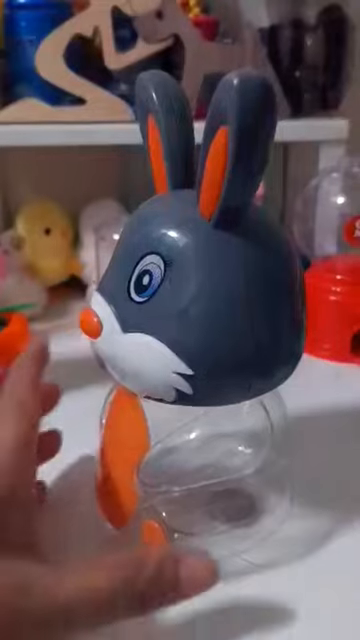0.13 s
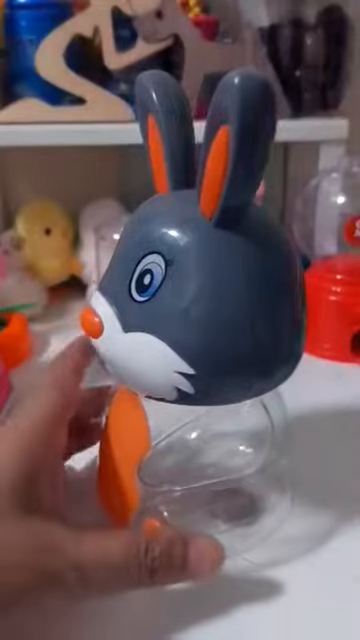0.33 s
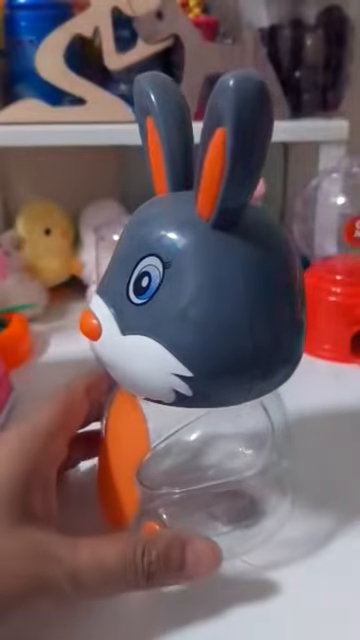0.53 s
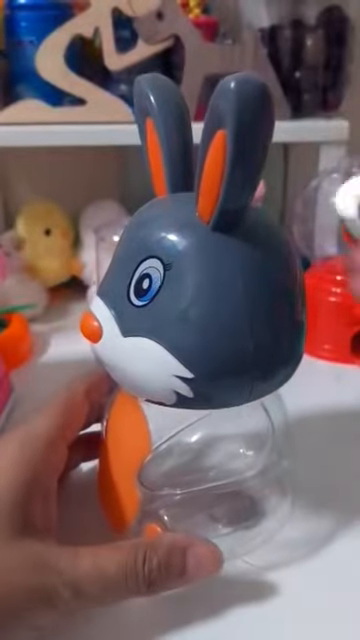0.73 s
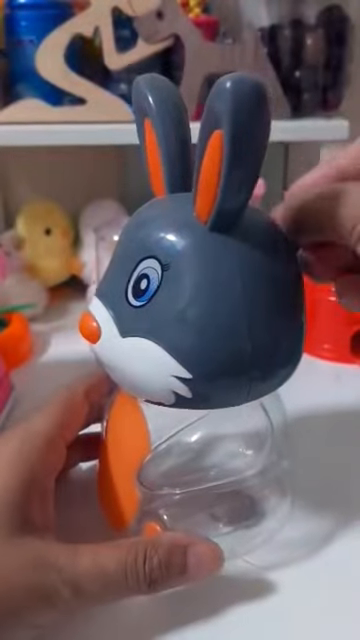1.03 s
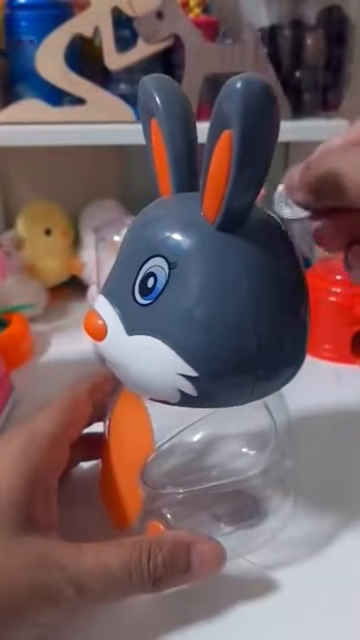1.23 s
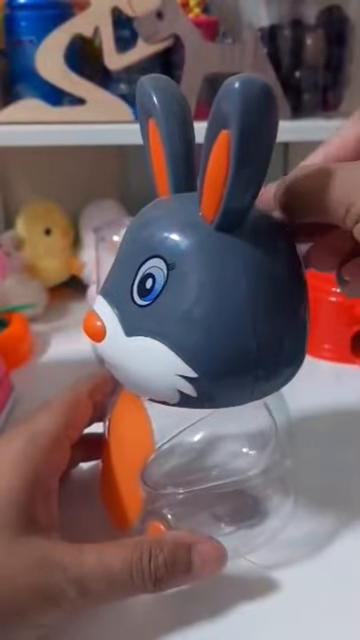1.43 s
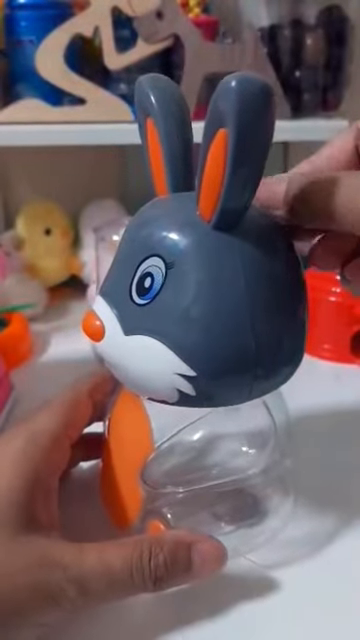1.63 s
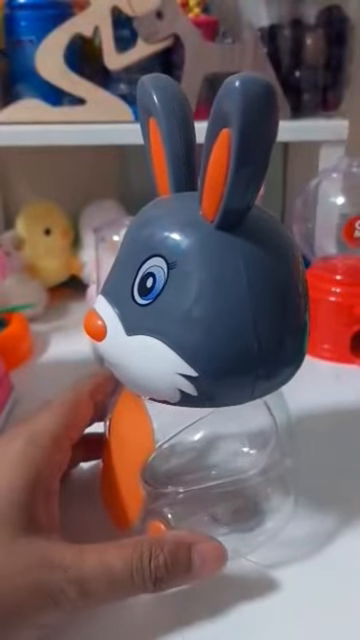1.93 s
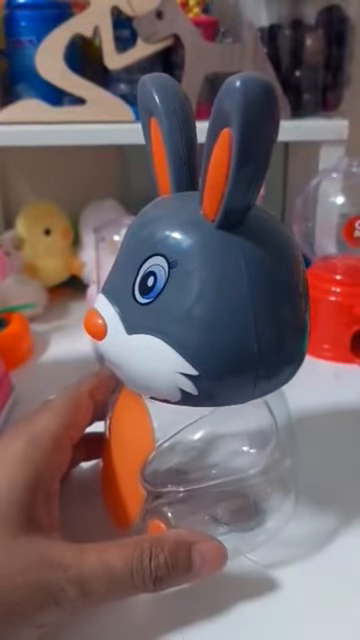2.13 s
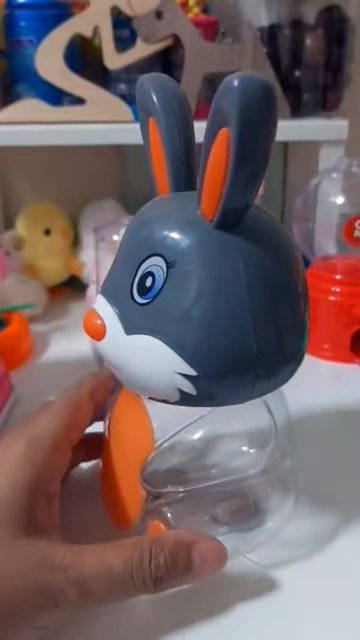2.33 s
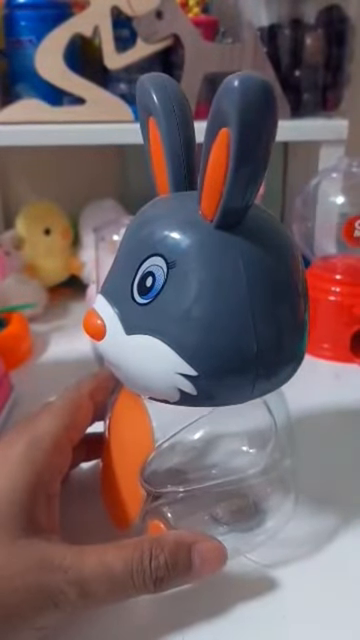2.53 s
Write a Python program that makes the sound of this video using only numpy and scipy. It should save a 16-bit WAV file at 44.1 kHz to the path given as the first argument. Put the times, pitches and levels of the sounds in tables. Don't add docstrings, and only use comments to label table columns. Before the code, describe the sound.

Coin falling into a hollow plastic bank: soft cloth rustles and four light ticks first, then a loud clack, a flurry of bouncing clatter and weakening taps, recorded closely indoors over low hum and hiss.

```python
import sys
import numpy as np
from scipy import signal
from scipy.io import wavfile
from scipy.ndimage import uniform_filter1d

SR = 44100
rng = np.random.default_rng(int(sys.argv[2]) if len(sys.argv) > 2 else 0)


def wav_out(sig):
    wavfile.write(sys.argv[1], SR, np.round(np.clip(np.atleast_2d(sig).T, -1, 1) * 32767).astype(np.int16))


def convert_level_to_amplitude(level_db):
    exponent = np.asarray(level_db, float) / 20
    return 10 ** exponent


N = 119070

# [t/s, peak level/dB, hollow body share/dB, coin brightness/dB, contact/ms]
BLOWS = [(1.8813, -5.5, -5.5, -6.5, 0.96), (1.8823, -16, -10.5, -5.5, 1.5), (1.9494, -15, -15, -9, 0.78),
         (1.9618, -25.5, 8, -14, 2.9), (1.9705, -33, -6, -6, 2.5), (1.994, -33, -2, -15, 1.3),
         (2.024, -14, -17, -10, 0.94), (2.0349, -4, -13.5, -8.5, 2.24), (2.0359, -11, -6, -8, 0.87),
         (2.0464, -15, -6, -11, 2.4), (2.081, -20, -4, -16, 0.96), (2.0858, -26, -13, -6, 2),
         (2.111, -33.5, 9, -24, 2.2), (2.1185, -29, -3, -5, 1.6), (2.1212, -32, 1, -2.5, 0.86),
         (2.13, -31, 1, -7, 1.5), (2.1457, -28, -15, -5, 0.79), (2.1623, -17.5, -7.5, -9, 1.1),
         (2.1643, -12, -11.5, -9, 1.2), (2.1675, -16.5, -33, -3, 1.6), (2.1722, -9, -19, -15, 1.35),
         (2.214, -10, -14, -18, 0.83), (2.2216, -14.5, -9, -12, 2.4), (2.224, -15, -27, -12, 1.3),
         (2.269, -20.5, -4.5, -26, 1.8), (2.3012, -27.5, -0.5, -26, 0.81), (2.337, -33, -2, -13, 1.9),
         (2.358, -28, -7, -40, 1.8), (2.369, -30.5, -17, -19, 1.5), (2.4127, -25, -14, -13, 2.8),
         (2.4197, -26.5, -23, -2, 2.6), (2.4275, -23, -15, -13, 2.8)]
# [centre t/s, level/dB, width/s]
RATTLES = [(1.9, -37, 0.0069), (1.925, -29.5, 0.0087), (1.968, -29, 0.007), (2.052, -38, 0.0076),
           (2.088, -29, 0.005), (2.118, -29.5, 0.009), (2.18, -21, 0.0045), (2.232, -51, 0.01),
           (2.275, -31.5, 0.0071), (2.36, -35, 0.0063), (2.424, -26.5, 0.011)]
# [t/s, peak level/dB, low ring f/Hz, high ring f/Hz, high ring level/dB]
TOUCHES = [
    (.936, -35, 2150, 7000, -8),
    (1.1615, -34, 4500, 7700, -5),
    (1.4738, -27, 1960, 4600, -4),
    (1.656, -27, 1100, 2400, 0),
]
# [f/Hz, level/dB, t60/s]
BODY = [(262, -2, 0.043), (328, -1, 0.032), (425, 2, 0.022), (577, -1, 0.029)]
# [f/Hz, level/dB, t60/s]
WALL = [(899, -0.5, 0.03), (1059, -1, 0.018), (1226, -0.5, 0.015), (1476, -7, 0.023), (1738, -5, 0.038),
        (2130, -6, 0.015), (2440, 1.5, 0.01), (2820, -3, 0.017), (3270, -4, 0.013), (3780, -5.5, 0.016),
        (4180, -0.5, 0.013)]
# [f/Hz, level/dB, t60/s]
COIN = [(4970, -1.5, 0.0091), (5050, 1.5, 0.0054), (6390, -9, 0.011), (6560, -4, 0.0053), (7240, 3, 0.0045),
        (7570, -10.5, 0.014), (7830, 0.5, 0.0049), (10640, -11, 0.02), (12350, -6, 0.0057)]
# [f/Hz, level/dB]
SHELL = [(480, 1.5), (720, -4), (1050, 0), (2200, 0.5), (5200, 0), (7800, -1), (9500, -3.5), (12000, 1.5)]
# [f/Hz, t60/s]
ROOM = [(200, 0.3), (600, 0.67), (1500, 0.35), (4000, 0.34), (8000, 0.2), (13000, 0.17)]
# [f/Hz, level per Hz/dB]
HUM = [(15, -58), (25, -96), (55, -6.5), (124, 6.5), (170, -10), (237, 0.5), (275, -10.5), (320, -4),
       (900, -13.5), (1170, -50), (1980, -120)]
# [f/Hz, level per Hz/dB]
HISS = [(800, -7.5), (1500, -13), (2900, -17.5), (4000, -24), (6000, -28.5), (9000, -34.5), (12500, -35),
        (13300, -37)]
# [f/Hz, width/Hz, level/dB]
TONES = [(65, 4.7, 3), (115, 42, -2.5), (249.4, 7.6, 7), (302, 5.7, 5.5), (532, 26, 4.5), (606.7, 6.3, 5),
         (655.2, 7.2, 10), (1123, 7.1, 10.5), (2090, 48, 1.5)]
# [f/Hz, level per Hz/dB]
CLOTH = [(900, 7), (2000, 11), (3000, 10), (5000, 0), (7500, 1), (12000, -15), (15000, -19)]
# [centre t/s, level/dB, width/s]
RUSTLES = [
    (.27, -42.5, 0.016),
    (.45, -46.5, 0.045),
    (.8, -42.5, 0.019),
    (.95, -39.5, 0.021),
    (1.07, -42.5, 0.027),
    (1.19, -40.5, 0.038),
    (1.5, -51, 0.18),
    (1.59, -46.5, 0.047),
]
# [f/Hz, correlation]
LIKENESS = [(60, 1), (130, 0.95), (280, 0.93), (620, 0.22), (1340, 0.19), (2910, 0.08), (6330, 0.36),
            (13800, -0.049)]
# [f/Hz, level/dB]
LEAN = [(60, -4), (110, 1.5), (200, -1.5), (370, -3.5), (670, -4), (1230, 3), (2250, 0.5), (4110, -1),
        (7520, 2), (13800, -3.5)]
# [f/Hz, phase/rad]
LEAD = [(0, 1), (520, -0.44), (780, 3.5), (2410, 2.5), (3010, 6), (3960, 0.5), (5170, 8.5), (6370, 20.5),
        (7490, 30.5), (9130, 23.5), (9990, 49.5), (10900, 36.5), (12900, 47), (14000, 42)]

BODY_DB, WALL_DB, COIN_DB, CRACK_DB, CHATTER_DB = 8, -7, 4.5, -0.5, -9
SCATTER_DB, DETUNE = 2.2, .02
CRACK_TOP_HZ, TREBLE_RIGHT_DB = 7600, 5
RATTLE_PER_S, RATTLE_SPREAD_DB, RATTLE_COIN_DB, RATTLE_BODY_DB = 1100, 4.5, 2, -8.5
TOUCH_T60_S, TOUCH_TICK_DB, TICK_REACH = .016, 0, 1.6
THUD_HZ, THUD_DB, THUD_T60_S = 82, -18, 0.065
LOW_CUT_HZ, RIGHT_LAG_S, RIGHT_DB = 342, .00011, 0.5
ROOM_DB, PREDELAY_S, SHARED_BELOW_HZ = -12, .009, 450
HUM_DB, HISS_DB, SPLIT_HZ = -32.5, -40.5, 900
KNEE_DB, SHARE, FAST_DB_PER_S = -17, .25, 600
SLOW_KNEE_DB, SLOW_SHARE, SLOW_DB_PER_S, SLOW_FALL_S = -21, 0.72, -4, 0.46
BASS_SHARE, CEILING, EDGE_HZ = 1, .97, 13000
START_S, FADE_IN_S = 0.2037, .003


def clack(peak_db, body_db, bright_db, contact_ms):
    t = np.arange(4096) / SR
    u = t[:800] * 1000 / max(contact_ms, .2)
    noise = rng.standard_normal((4, 800))

    clicks = np.sign(noise[0]) * (rng.random(800) < .08)
    chatter = clicks * u * np.exp(-u ** 2)
    chatter *= convert_level_to_amplitude(CHATTER_DB + 2.0 * (contact_ms + 0.5)) / (np.linalg.norm(chatter) + 1e-9)
    chatter[10] = 1
    chatter /= np.linalg.norm(chatter)

    hard_parts = convert_level_to_amplitude(WALL_DB) * ring(WALL, t) + convert_level_to_amplitude(COIN_DB + bright_db) * ring(COIN, t)
    out = signal.fftconvolve(hard_parts, chatter[None], axes=1)[:, :4096]
    body_onset = np.minimum(t * 1000 / contact_ms, 1)
    out += convert_level_to_amplitude(BODY_DB + body_db) * ring(BODY, t) * body_onset

    crack_shape = np.minimum(u / 0.21, 1) * np.exp(-(u / 2.48) ** 1.3)
    crack = (noise[1:3] + 0.32 * noise[3]) * crack_shape
    dull = signal.lfilter([.4], [1, -.6], crack)
    treble = signal.butter(1, [CRACK_TOP_HZ / 1.84, CRACK_TOP_HZ], "band", fs=SR, output="sos")
    bright = signal.sosfilt(treble, crack) * convert_level_to_amplitude([[-TREBLE_RIGHT_DB], [TREBLE_RIGHT_DB]])
    out[:, :800] += convert_level_to_amplitude(CRACK_DB) * (dull + convert_level_to_amplitude(bright_db + 2.5) * bright)
    return convert_level_to_amplitude(peak_db) * out


def ring(modes, t):
    hz, db, t60 = np.transpose(modes)[:, :, None]
    chance = rng.standard_normal((3, len(modes), 1))
    turn = 2 * np.pi * rng.random((2, len(modes), 1))
    hz = hz * (1 + DETUNE * chance[2])
    strength_db = db + SCATTER_DB * (chance[2] + 0.3 * chance[:2])
    phase = turn * np.clip(hz / 3500, 0, 1)
    partials = convert_level_to_amplitude(strength_db - 60 * t / t60) * np.sin(2 * np.pi * hz * t + phase)
    return partials.sum(1)


def rattle():
    contact_db = RATTLE_SPREAD_DB * np.minimum(rng.exponential(1, N), 3)
    contacts = convert_level_to_amplitude(contact_db) * (rng.random(N) < RATTLE_PER_S / SR)
    patch, t = rng.integers(0, 8, N), np.arange(1024) / SR
    out = np.zeros((2, N))
    for k in range(8):
        tone = ring(WALL, t) + convert_level_to_amplitude(RATTLE_COIN_DB) * ring(COIN, t) + convert_level_to_amplitude(RATTLE_BODY_DB) * ring(BODY, t)
        out += signal.oaconvolve((contacts * (patch == k))[None], tone)[:, :N]
    return swells(RATTLES) * evened(out)


def touch(peak_db, low_hz, high_hz, high_db):
    t = np.arange(4096) / SR
    modes = []
    for hz, db in [(low_hz, 0), (high_hz, high_db)]:
        modes += [(hz, db, TOUCH_T60_S), (hz * 1.08, db, TOUCH_T60_S)]
    tick = convert_level_to_amplitude(TOUCH_TICK_DB - 60 * t / TOUCH_T60_S) * rng.standard_normal((2, 4096))
    tick = signal.sosfilt(signal.butter(2, TICK_REACH * high_hz, fs=SR, output="sos"), tick)
    onset = np.minimum(t * 1000, 1)
    return convert_level_to_amplitude(peak_db) * (ring(modes, t) + tick) * onset


def thud():
    t = np.maximum(np.arange(N) / SR - BLOWS[0][0], 0)
    return convert_level_to_amplitude(THUD_DB - 60 * t / THUD_T60_S) * np.sin(2 * np.pi * THUD_HZ * t)


def shell(x):
    hz = np.fft.rfftfreq(2048, 1 / SR)
    log_gain = np.log(convert_level_to_amplitude(read(SHELL, hz)))
    log_gain = np.concatenate([log_gain, log_gain[-2:0:-1]])
    response = np.exp(np.conj(signal.hilbert(log_gain)))
    taps = np.fft.ifft(response).real[:1024]
    return signal.oaconvolve(x, taps[None, None], axes=2)[:, :, :N]


def room(x):
    taps = np.zeros((2, SR // 2))
    at = np.arange(0, SR // 2 - 20, 20) + rng.integers(0, 20, (2, (SR // 2 - 1) // 20))
    np.put_along_axis(taps, at, rng.choice([-1., 1.], at.shape), axis=1)
    hz, t, z = signal.stft(taps, SR, nperseg=256)
    z = np.where(hz[:, None] < SHARED_BELOW_HZ, z[:1] + 0.36 * z[::-1], z)
    decay = convert_level_to_amplitude(-60 * t / read(ROOM, hz)[:, None])
    tail = signal.istft(z * decay, SR, nperseg=256)[1]
    tail *= np.minimum(np.arange(tail.shape[1]) / SR / PREDELAY_S, 1) ** 2
    return signal.fftconvolve(x, tail / np.linalg.norm(tail[0]), axes=1)[:, :N]


def background():
    hum = convert_level_to_amplitude(HUM_DB) * air(HUM, 0.63, high_hz=SPLIT_HZ, size=2048)
    hiss = convert_level_to_amplitude(HISS_DB) * air(HISS, 2.94, low_hz=SPLIT_HZ, size=2048)
    rustle = swells(RUSTLES) * air(CLOTH, 3.4, size=256)
    return hum + hiss + rustle


def air(spectrum, patchy_db, low_hz=0., high_hz=30000., size=1024):
    frames, hz = 4 * N // size + 5, np.fft.rfftfreq(size, 1 / SR)
    a, b, c, d, patches = rng.standard_normal((frames, len(hz), 5)).T
    patches = uniform_filter1d(patches, size=10, axis=0)
    patches = evened(uniform_filter1d(patches, size=10, axis=1))

    same = np.clip(read(LIKENESS, hz), -1, 1)[:, None]
    left = a + 1j * b
    right = same * left + np.sqrt(1 - same ** 2) * (c + 1j * d)
    right = right * np.exp(-1j * read(LEAD, hz))[:, None]
    lean = convert_level_to_amplitude(read(LEAN, hz) / 2)[:, None]

    level_db = read(spectrum, hz)
    for tone_hz, width, db in TONES:
        level_db = level_db + db / (1 + ((hz - tone_hz) / width) ** 2)
    inside = ((hz >= low_hz) & (hz < high_hz))[:, None]
    z = np.array([left * lean, right / lean]) * convert_level_to_amplitude(level_db[:, None] + patchy_db * patches) * inside
    return evened(signal.istft(z, nperseg=size, noverlap=size * 3 // 4)[1][:, :N])


def swells(rows):
    t = np.arange(N) / SR
    return sum(convert_level_to_amplitude(db) * np.exp(-.5 * ((t - s) / width) ** 2) for s, db, width in rows)


def read(points, hz):
    f, value = np.transpose(points)
    return np.interp(np.log(hz + 1), np.log(f + 1), value)


def evened(x):
    return x / np.sqrt(np.mean(x ** 2) + 1e-20)


def scene():
    coin = np.zeros((3, 2, N + 5000))
    sounds = [(s, touch(*tap)) for s, *tap in TOUCHES]
    sounds += [(s, clack(*blow)) for s, *blow in BLOWS]
    for k, (s, sound) in enumerate(sounds):
        start = round(s * SR)
        coin[k % 3, :, start:start + 4096] += sound
    coin[0, :, :N] += rattle()

    coin = shell(coin) * convert_level_to_amplitude([[-RIGHT_DB / 2], [RIGHT_DB / 2]])
    coin[:, 1] = np.roll(coin[:, 1], round(RIGHT_LAG_S * SR), axis=1)
    coin = signal.sosfilt(signal.butter(3, LOW_CUT_HZ, "high", fs=SR, output="sos"), coin)
    reverb = convert_level_to_amplitude(ROOM_DB) * sum(room(group) for group in coin)
    return coin.sum(0) + reverb + thud() + background()


def excess(x, knee_db, db_per_s, size):
    power_db = 10 * np.log10(abs(uniform_filter1d((x ** 2).mean(0), size)) + 1e-12)
    fall = np.arange(N) * db_per_s / SR
    held_db = np.maximum.accumulate(power_db + fall) - fall
    return np.maximum(held_db - knee_db, 0)


def low_pass(x):
    return signal.sosfilt(signal.butter(12, 14360, fs=SR, output="sos"), x)


def record(dry):
    quick = uniform_filter1d(excess(dry, KNEE_DB, FAST_DB_PER_S, size=128), size=200, origin=99)
    r = np.exp(-1 / (SLOW_FALL_S * SR))
    slow = signal.lfilter([1 - r], [1, -r], excess(dry, SLOW_KNEE_DB, SLOW_DB_PER_S, size=4096))
    bass = signal.sosfilt(signal.butter(1, 220, fs=SR, output="sos"), dry)
    ducked = dry - bass + bass / convert_level_to_amplitude(BASS_SHARE * slow)
    x = ducked / convert_level_to_amplitude(SHARE * quick + SLOW_SHARE * slow)
    x = CEILING * np.tanh(x / CEILING)
    band_limit = signal.firwin(101, EDGE_HZ, window=("kaiser", 8), fs=SR)
    x = signal.oaconvolve(x, band_limit[None], "same")
    mix = x * np.clip((np.arange(N) / SR - START_S) / FADE_IN_S, 0, 1)
    return low_pass(mix)


dry = scene()
out = record(dry)
wav_out(out)
```